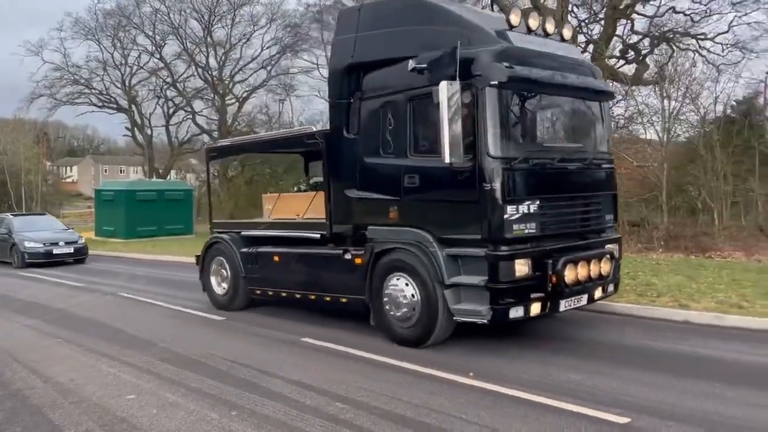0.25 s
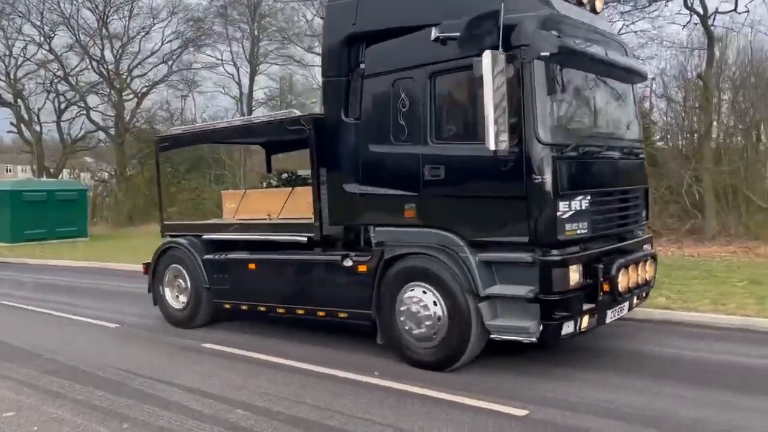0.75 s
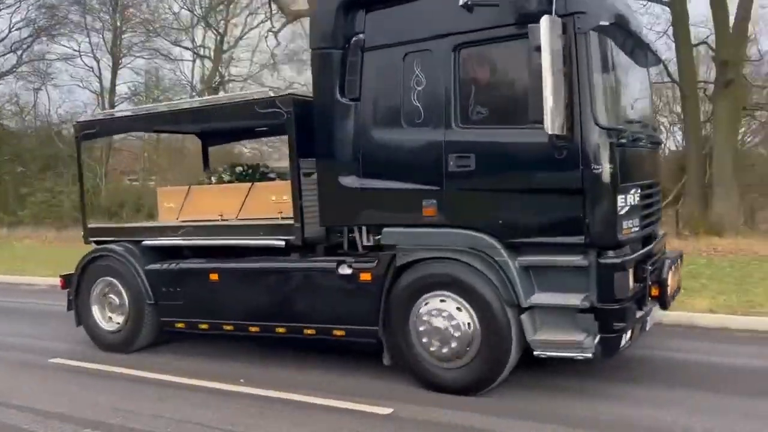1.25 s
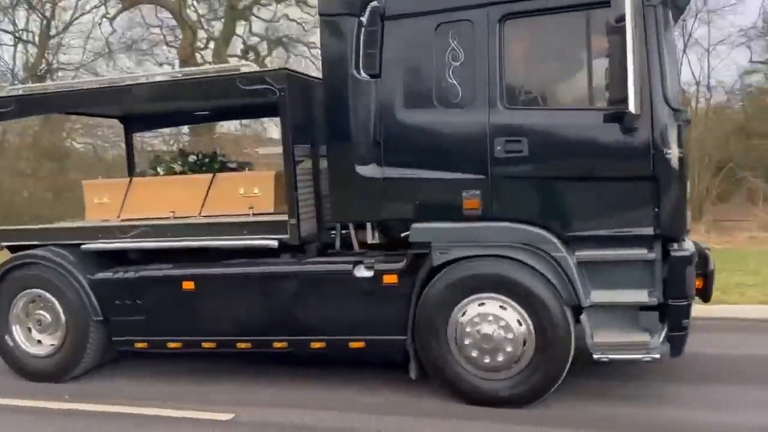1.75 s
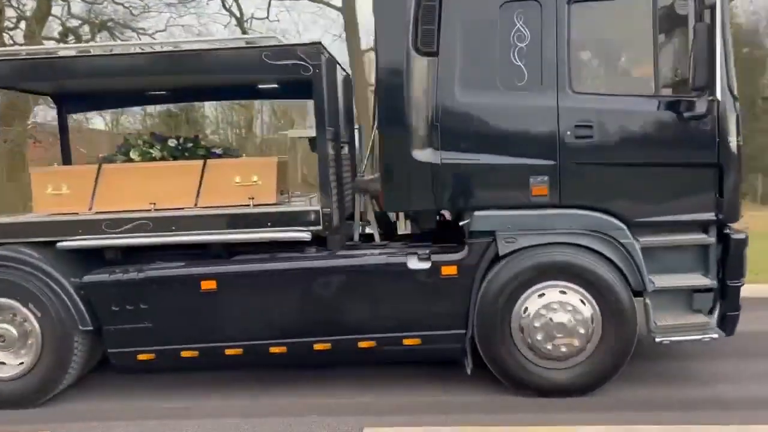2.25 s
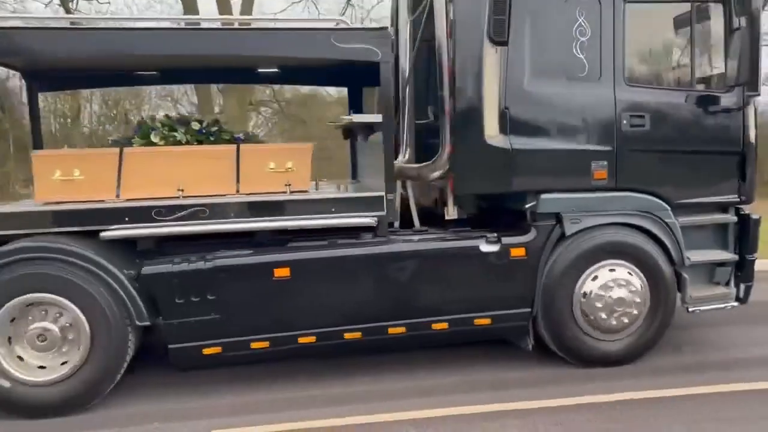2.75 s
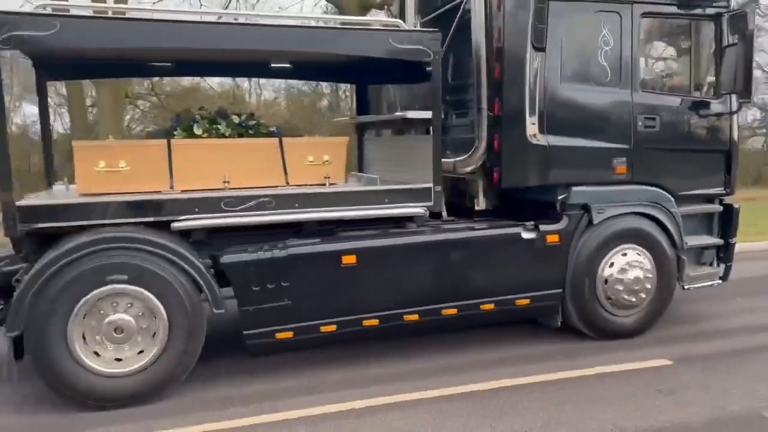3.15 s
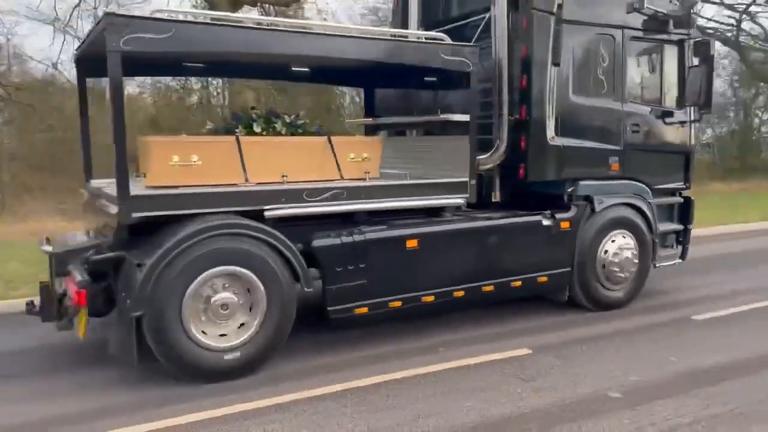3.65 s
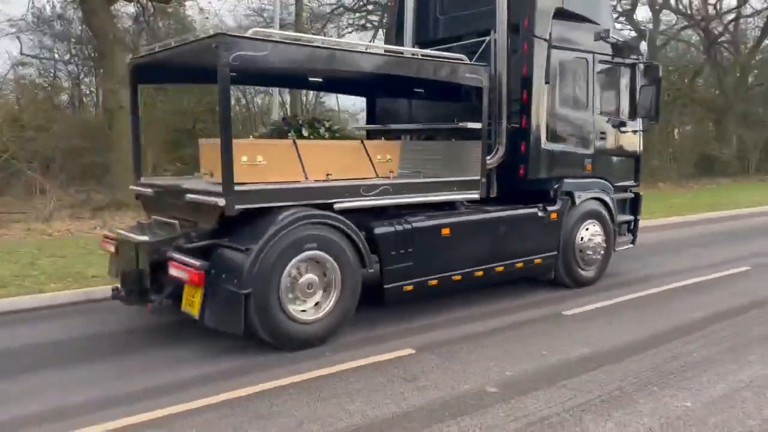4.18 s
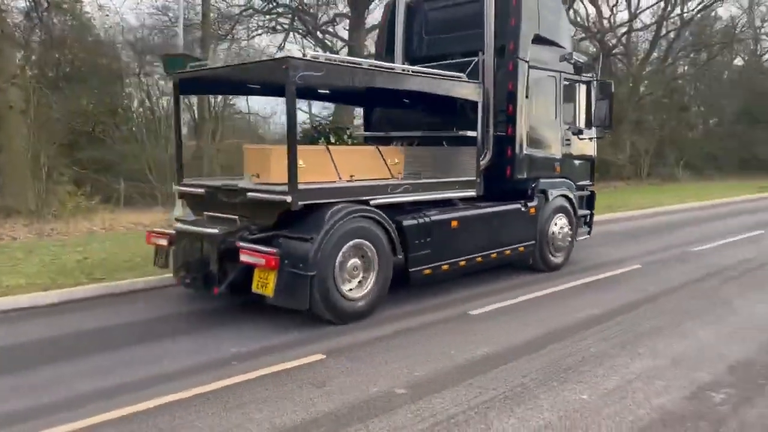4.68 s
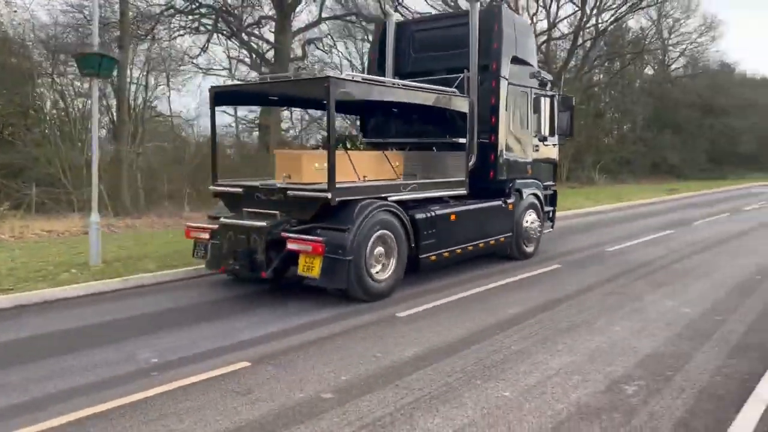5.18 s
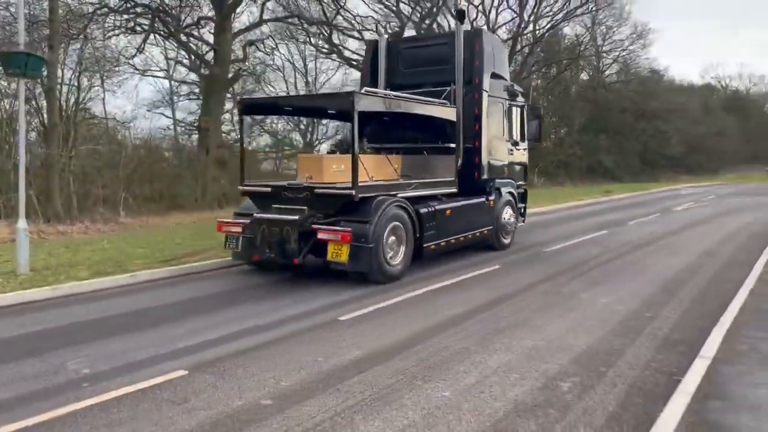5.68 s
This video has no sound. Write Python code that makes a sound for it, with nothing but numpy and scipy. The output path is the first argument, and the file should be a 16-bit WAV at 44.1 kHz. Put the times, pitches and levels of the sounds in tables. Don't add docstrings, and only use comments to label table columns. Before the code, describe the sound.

Outdoors beside an open road, a heavy diesel lorry rolls slowly past a small handheld stereo microphone. From 0 s a single loud air-horn note is already sounding, around the B below middle C, buzzing and brassy. It brightens near 0.5 s, then turns duller and weaker around 1 s, swells a little in its low tones, and shuts off at about 1.5 s with a short tail, highs going first. The engine runs beneath throughout at constant speed: a fast, low six-cylinder throb of about fifty pulses a second, slightly uneven. After the horn it is the main sound. From about 2 to 3.3 s the exhaust bark is boomy; block knock, cover clatter and fine injector ticks grow clearer, strongest near 4 s. Tyre, fan and gas hiss puffs softly with the firing. Road reflections add a moving hollow sweep. Towards 5.9 s a deep exhaust thud grows while the clatter softens slightly.

```python
import sys
import numpy as np
from scipy import signal
from scipy.fft import rfft, irfft
from scipy.io import wavfile

SR = 44100
rng = np.random.default_rng(int(sys.argv[2]) if len(sys.argv) > 2 else 0)


def to_wav(sig):
    pcm = np.clip(np.atleast_2d(sig), -1, 1) * 32767
    pcm = np.round(pcm).astype(np.int16)
    wavfile.write(sys.argv[1], SR, pcm.T)


def natural_amplitude(level_db):
    exponent = np.asarray(level_db, float) / 20
    return 10 ** exponent


N = 261200


def rms_one(x):
    return x / np.sqrt(np.mean(x ** 2) + 1e-20)


def in_time(rows):
    time_s, *columns = np.transpose(rows)
    return [np.interp(np.arange(N) / SR, time_s, column) for column in columns]


def at_hz(points, hz):
    table_hz, value = np.array(points).T
    return np.interp(np.log(hz), np.log(table_hz), value)


def drift(rate_hz):
    r = np.exp(-80 * np.pi * rate_hz / SR)
    slow = signal.lfilter([1], [1, -2 * r, r * r], rng.standard_normal(N // 40 + 2002))[2000:]
    return np.interp(np.arange(N) / 40, np.arange(len(slow)), rms_one(slow))


def band_pass(x, edges_hz):
    return signal.sosfilt(signal.butter(2, edges_hz, "band", fs=SR, output="sos"), x)


def off_road(x, echo_db):
    nearest_s, nearest_m, speed_m_per_s = 2.45, 4.0, 2.16
    source_height_m, ear_height_m = 3.0, 1.4
    dull_hz = 900
    distance_m = np.hypot(nearest_m, speed_m_per_s * (np.arange(N) / SR - nearest_s))
    lag_s = 2 * source_height_m * ear_height_m / distance_m / 343
    late = np.arange(N) - lag_s * SR
    dull = signal.lfilter(*signal.butter(1, dull_hz, fs=SR), x)
    return x + natural_amplitude(echo_db) * np.array([np.interp(late, np.arange(N), v) for v in dull])


def ports(x):
    # (frequency [Hz], difference [dB])
    balance = [(60, 0.0), (97, -0.5), (160, -1.0), (250, -2.0), (410, -0.5), (670, -5.0), (1080, 3.0),
               (1750, -0.5), (2830, -2.0), (4580, -2.0)]
    # (frequency [Hz], left lead [rad])
    lead_table = [(0, 0), (600, .2), (860, 1.7), (1290, 0), (1640, -1), (1890, -.3), (2150, .7),
                  (2410, -1.1), (2670, -.1), (3010, -.7), (3450, .3), (3700, 0)]
    hz = np.maximum(np.fft.rfftfreq(N, 1 / SR), 1)
    lead_rad = np.interp(hz, *np.transpose(lead_table))
    skew = natural_amplitude(at_hz(balance, hz) / 2) * np.exp(.5j * lead_rad)
    return irfft(rfft(x) * [skew, 1 / skew], N)


def hiss(turns, low_db, mid_db, high_db):
    # (frequency [Hz], level [dB per Hz])
    spectrum = [(20, -20), (55, -7.5), (90, -5.5), (215, -6), (410, -17.5), (700, -14), (850, -18.5),
                (1400, -29), (1700, -32), (2200, -44.5), (2800, -41), (4000, -44), (5000, -59), (8500, -55),
                (11000, -66.5)]
    # (frequency [Hz], left-right likeness [0..1])
    likeness = [(60, 1), (110, 1), (210, 0.96), (380, 1), (710, 0.87), (1330, 0.67), (2470, 0.41),
                (4580, 0.72), (6000, 0.32), (10000, 0.18)]
    edges_hz = 20 * 2 ** np.arange(0, 9.4, .4)
    white = rng.standard_normal((2, 2, N))
    together = drift(8)
    puff_db = 1.3 * np.cos(6 * np.pi * turns) + 0.44 * np.cos(2 * np.pi * turns - .5)
    mids, sides = 0, 0
    for k, (low_hz, high_hz) in enumerate(zip(edges_hz, edges_hz[1:])):
        mid, side = band_pass(white[k % 2], [low_hz, high_hz])
        hz = np.sqrt(low_hz * high_hz)
        alike = np.clip(at_hz(likeness, hz), 0, 1)
        mid_share = np.clip(np.log2(hz / 250), 0, 1)
        high_share = np.clip(np.log2(hz / 1200), 0, 1)
        level_db = low_db + mid_share * (mid_db + 11.0 - low_db) + high_share * (high_db + 19.0 - mid_db)
        flicker_db = .5 * together + 1.3 * drift(10)
        gain = natural_amplitude(at_hz(spectrum, hz) + level_db + 22.0 + mid_share * puff_db + flicker_db)
        mids = mids + gain * np.sqrt(alike) * mid
        sides = sides + gain * np.sqrt(1 - alike) * side
    return off_road(ports(mids) + sides * [[1], [-1]], echo_db=-9.5)


def ring(clicks, modes, rub_db):
    force = rms_one(clicks) + natural_amplitude(rub_db) * rng.standard_normal(N)
    out = 0
    for hz, level_db, t60_s in modes:
        r, w = natural_amplitude(-60 / (t60_s * SR)), 2 * np.pi * hz / SR
        out = out + signal.lfilter([0, natural_amplitude(level_db) * np.sin(w)], [1, -2 * r * np.cos(w), r * r], force)
    return rms_one(band_pass(out, [modes[0][0] * 0.985, modes[-1][0] * 1.03]))


def block(turns, knock_db, clack_db, tick_db):
    # (crank angle [turns], body knock [dB], cover clack [dB], injector tick [dB])
    contacts = [(.04, 0, -12, -4), (.2, -7, -10, -4), (.38, -13, -8, -6), (.55, -13, -4, -1),
                (.71, -13, -8, -4), (.88, -13, -3, -4), (1.04, 0, -12, -1), (1.2, -7, -10, -4),
                (1.38, -13, -10, -3), (1.55, -13, 0, -5), (1.71, -13, -10, -5), (1.88, -13, -2, -4)]
    # (frequency [Hz], level [dB], t60 [s])
    body_modes = [(373, 1.5, 0.031), (462, -1, 0.096), (600, 1.5, 0.074), (546, -4.5, 0.15),
                  (692, -2, 0.079), (930, -17, 0.043)]
    # (frequency [Hz], level [dB], t60 [s])
    cover_modes = [(1870, 0, .035), (1960, -3, .03), (2430, -5, .025)]
    # (frequency [Hz], level [dB], t60 [s])
    injector_modes = [(3480, 0, .055), (3670, -.5, .018), (3860, -8, .015)]
    angle, *strengths_db = np.transpose(contacts)
    cycle = 2 * np.arange(int(turns[-1] / 2) + 1)[:, None]
    when = np.interp((cycle + angle).ravel(), turns, np.arange(N), right=N - 1)

    def part(strength_db, modes, rub_db, jitter_s):
        luck = rng.standard_normal((len(when), 2))
        at = np.clip(when + jitter_s * SR * luck[:, 0], 0, N - 2).astype(int)
        clicks = np.zeros(N)
        clicks[at] = natural_amplitude(np.tile(strength_db, len(cycle)) + 2.1 * luck[:, 1])
        return ring(clicks, modes, rub_db)

    body = part(strengths_db[0], body_modes, rub_db=-12.0, jitter_s=.00015)
    cover = part(strengths_db[1], cover_modes, rub_db=-3.0, jitter_s=.0002)
    injector = part(strengths_db[2], injector_modes, rub_db=-6.0, jitter_s=.00002)
    mix = natural_amplitude(knock_db) * body + natural_amplitude(clack_db) * cover + natural_amplitude(tick_db) * injector
    return off_road(ports(mix), echo_db=-3.0)


def exhaust(turns, thud_db, bark_db, uneven_db):
    # (multiple of crank rate, level [dB])
    orders = [(1, -19.5), (2, -25), (3, 1.5), (4, -12), (5, -22.5), (6, 8), (7, -10.5), (8, -47.5), (9, -1),
              (10, -34), (11, 0), (12, 3), (13, -15), (14, -12.5), (15, -2.5), (16, -6), (17, -29.5),
              (18, -12.5), (19, -14), (20, -18), (21, -21), (22, -14), (23, -30), (24, -25), (25, -23),
              (26, -27), (27, -24), (28, -18), (29, -27.5), (30, -27)]
    skew_rad = .7
    boom_order, boom_width, boom_peak_db = 10.86, 1.2, 2.5
    shows_s, rise_db_per_s = 1.9, 6.5
    gone_s, fade_db_per_s = 3.29, 6.0
    coarse = 8
    turns, thud_db, bark_db, uneven_db = [c[::coarse] for c in (turns, thud_db, bark_db, uneven_db)]
    t = np.arange(0, N, coarse) / SR
    boom_db = boom_peak_db - fade_db_per_s * np.maximum(t - gone_s, 0)
    boom_db = boom_db - rise_db_per_s * np.clip(shows_s - t, 0, 1)
    out = 0
    for k, db in orders:
        level_db = thud_db if k < 5 else bark_db - 5.5
        level_db = level_db + uneven_db * (k % 3 > 0)
        level_db = level_db + boom_db * np.exp(-((k - boom_order) / boom_width) ** 2)
        sway_db, sway_rad = .6 * drift(2)[::coarse], .1 * drift(2)[::coarse]
        phase = 2 * np.pi * k * (turns - .5) - skew_rad + sway_rad
        out = out + natural_amplitude(level_db + db + sway_db) * np.cos(phase)
    out = signal.resample_poly(out, coarse, 1)[:N]
    return off_road(ports(out), echo_db=-5.5)


def horn():
    # (time [s], level [dB], brightness [dB per octave], echo lag off cab and verge [ms])
    swing = [
        (0, 0.5, 2.5, 3.32),
        (.15, 0.5, 0.5, 3.63),
        (.3, 0.8, 5.5, 3.52),
        (.5, 1.5, 6, 3.476),
        (.7, -0.5, 2.5, 3.54),
        (.95, -3.9, 0.4, 3.9),
        (1.2, -3, 0.95, 4.67),
        (1.52, 2.5, -5, 5.53),
    ]
    # (time [s], pitch [Hz])
    pitch = [(0, 254.05), (.5, 253.95), (1, 253.6), (1.5, 253.35), (1.7, 253.0)]
    # (time [s], lag [ms])
    road_lag = [(0, 3.9), (.13, 4.17), (.35, 4.28), (.6, 4.57), (1.1, 5.14), (1.27, 5.6), (1.7, 6.3)]
    # (multiple, level [dB], left-right difference [dB])
    partials = [(1, -19, -3.5), (2, -21, -2.5), (3, -25, -2), (4, -32.5, 4), (5, -44, 8), (6, -44.5, -1),
                (7, -54.5, -10.5), (8, -45, -0.5), (9, -41, 0), (10, -48.5, 9.5), (11, -50.5, -14),
                (12, -51.5, 0), (13, -57, -3.5), (14, -60, -6), (15, -65, 3.5)]
    leads_rad = [-.31, .05, 1.48, .69, -.71, -.56, -2.49, 2.11, -1.87, -1.63, -2.09, -.94, -.37, 0, -.37]
    mouth_rad = [0, .7, -1.1, -2, 2]
    valve_s, valve_t60_s, valve_steepens = 1.526, 0.38, 0.71
    turn_s, turn_spread_s = .55, .04
    blare_before_db, blare_after_db, blare_fade_db_per_s = 2, 10.5, 6.5
    tilt_before_db, tilt_after_db = 1.5, -10
    echo_rise_db_per_s, echo_dull_db, echo_dulling_db_per_s = 7.5, 0.46, 5.5

    held = slice(0, int(pitch[-1][0] * SR) + SR // 10)
    t = np.arange(N)[held] / SR
    curves = in_time(pitch) + in_time(road_lag) + in_time(swing)
    pitch_hz, lag_ms, level_db, bright_db, echo_ms = [c[held] for c in curves]
    turned = 1 / (1 + np.exp((turn_s - t) / turn_spread_s))
    blare_db = blare_before_db + turned * (blare_after_db - blare_before_db - blare_fade_db_per_s * t)
    tilt_db = tilt_before_db + turned * (tilt_after_db - tilt_before_db)
    lag_s = lag_ms / 1000 + np.array([[.00003], [-.00003]])
    base_phase = 2 * np.pi * np.cumsum(pitch_hz) / SR
    side = np.array([[.5], [-.5]])
    out = np.zeros((2, N))
    for (k, db, balance_db), lead_rad in zip(partials, leads_rad):
        phase = k * base_phase + side * lead_rad
        flutter_db = .12 * k * np.array([drift(2)[held], drift(2)[held]])
        shut_db = -60 * np.maximum(t - valve_s, 0) / valve_t60_s * k ** valve_steepens
        if k <= len(mouth_rad):
            phase = phase + mouth_rad[k - 1]
            echo_db = echo_rise_db_per_s * t - k * (echo_dull_db + echo_dulling_db_per_s * t)
            echo = natural_amplitude(echo_db) * np.cos(phase - 2 * np.pi * k * pitch_hz * echo_ms / 1000)
            wave = natural_amplitude(level_db + bright_db * np.log2(k)) * (np.cos(phase) + echo)
        else:
            bounce = natural_amplitude(1.5 - .55 * k) * np.cos(phase - 2 * np.pi * k * pitch_hz * lag_s)
            wave = natural_amplitude(blare_db + tilt_db * np.log2(k / 5)) * (np.cos(phase) + bounce)
        out[:, held] += natural_amplitude(db + side * balance_db + flutter_db + shut_db) * wave
    return out


def scene():
    # (time [s], crank rate [turns per s])
    crank = [(0.0, 17.068), (0.7, 17.132), (1.4, 17.077), (2.1, 17.051), (2.8, 17.103), (3.5, 17.125),
             (4.2, 17.066), (4.9, 17.062), (5.9, 17.061)]
    # (time [s], open view of block [dB], view of silencer [dB])
    views = [(0, 2.2, 3), (.5, 0.5, -3), (1, -3.5, -4), (1.5, -3.5, -3), (1.9, -3.5, -0.5),
             (2.4, -0.5, 2.2), (3.1, 2.6, 0.8), (3.9, 4, 1.8), (4.7, 2.5, 5.1), (5.4, 2.25, 6),
             (5.92, 0.8, 9)]
    turns = -.028 + np.cumsum(in_time(crank)[0]) / SR
    block_view_db, silencer_view_db = in_time(views)

    def seen(db, block_share, silencer_share):
        return db + block_share * block_view_db + silencer_share * silencer_view_db

    bark_db = seen(-31, .5, -0.18)
    noise = hiss(turns, bark_db, mid_db=seen(-42.5, 0.36, .2), high_db=seen(-50.5, 1, .01))
    knocks = block(turns, knock_db=seen(-45.5, 0.47, .1), clack_db=seen(-56, 0.95, 0.37),
                   tick_db=seen(-55.5, 1.2, .3))
    pulses = exhaust(turns, seen(-41, .01, 1), bark_db, uneven_db=seen(-1.5, .1, -0.12))
    return noise + knocks + pulses + horn()


def low_pass(x):
    return signal.sosfilt(signal.butter(12, 11990, fs=SR, output="sos"), x)


def record(dry):
    dip_hz, dip_width_hz, dip_share = 5600, 500, .85
    dipped = signal.lfilter(*signal.iirnotch(dip_hz, dip_hz / dip_width_hz, SR), dry)
    mix = dry + dip_share * (dipped - dry)
    return low_pass(mix)


dry = scene()
out = record(dry)
to_wav(out)
```